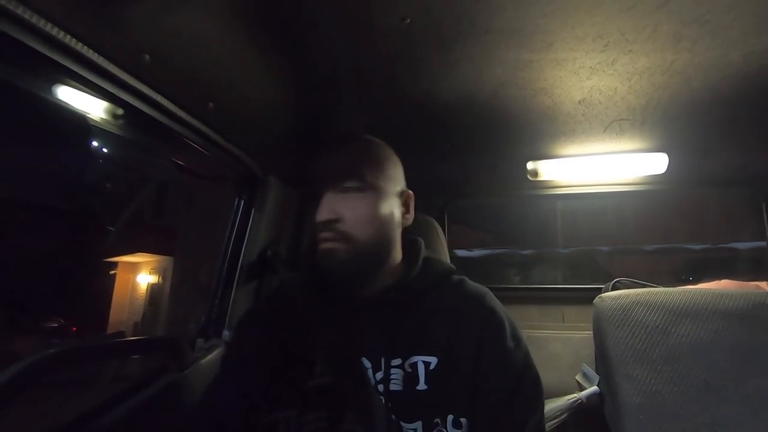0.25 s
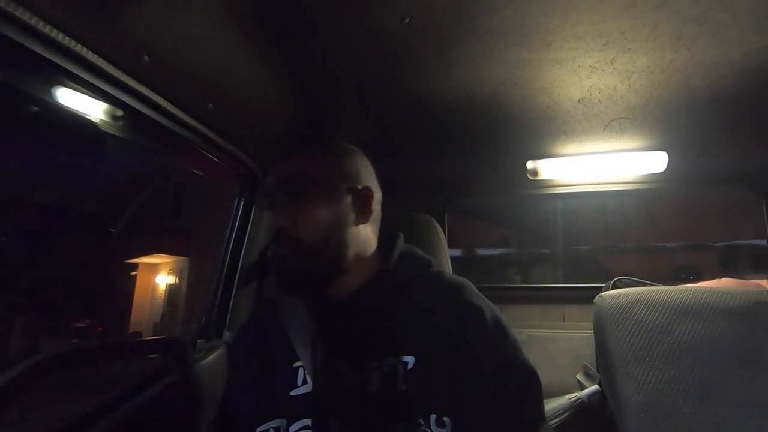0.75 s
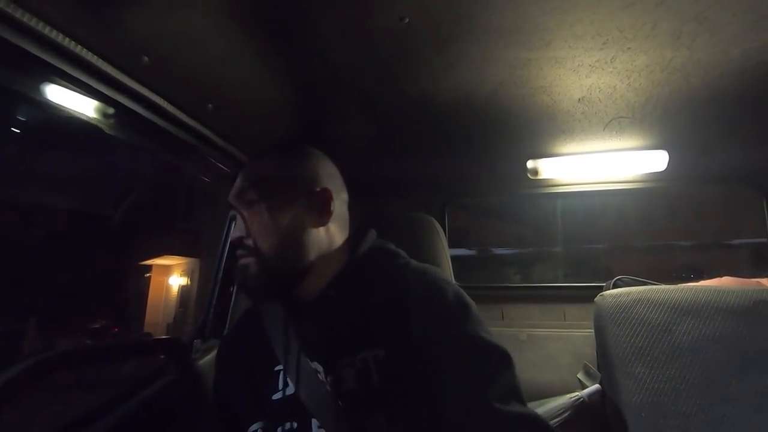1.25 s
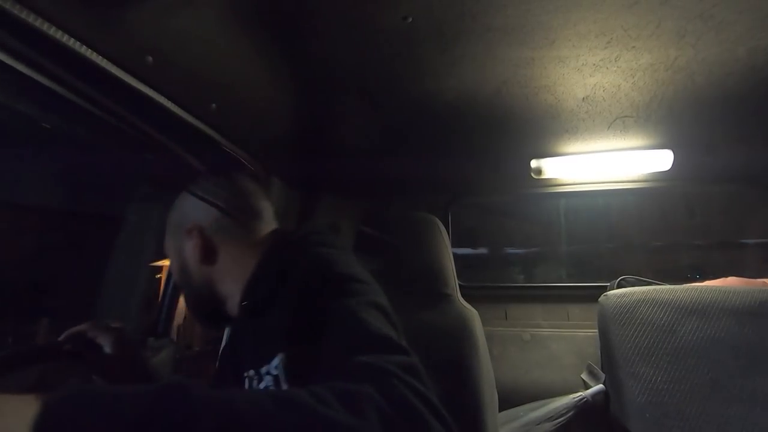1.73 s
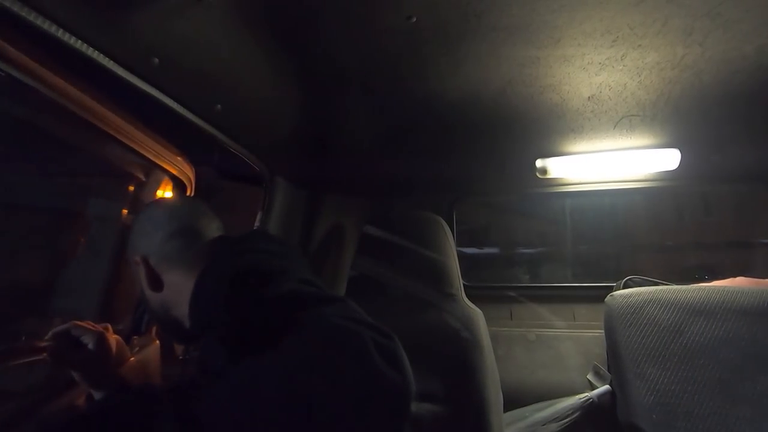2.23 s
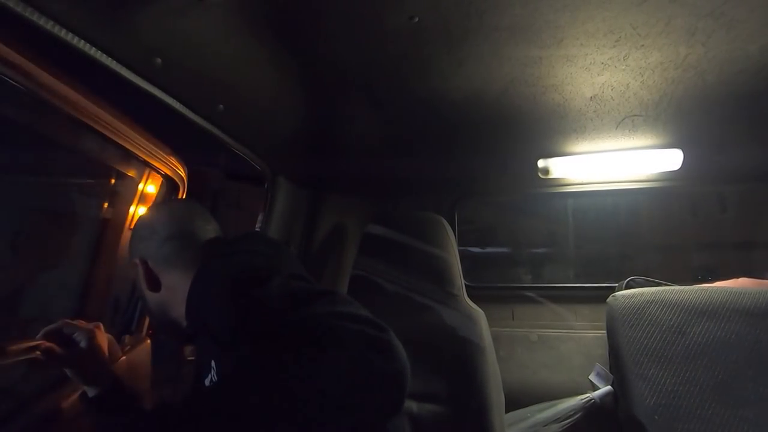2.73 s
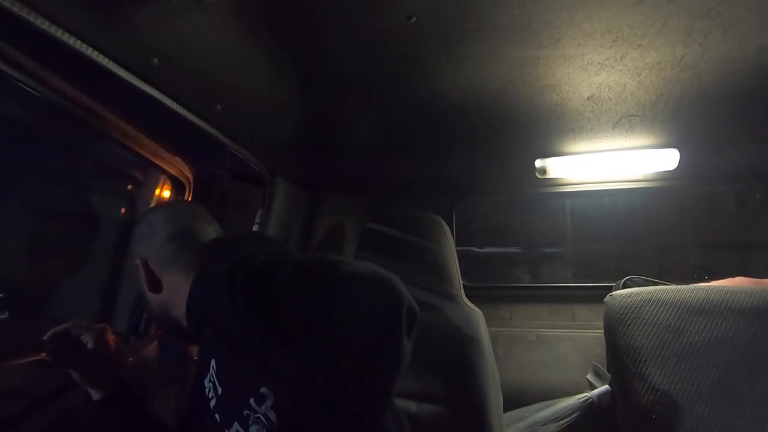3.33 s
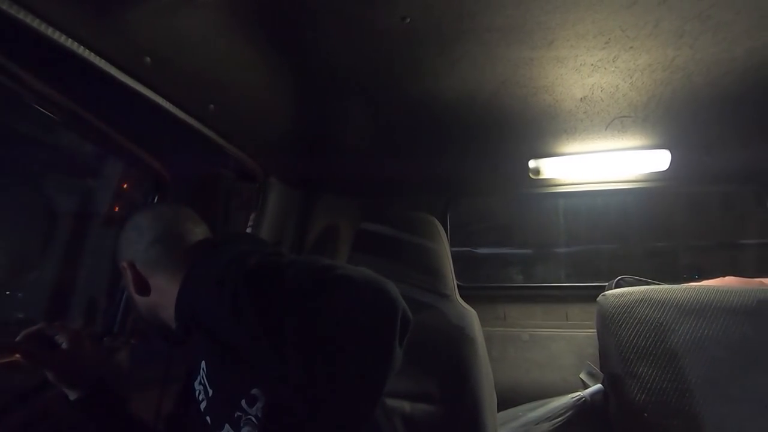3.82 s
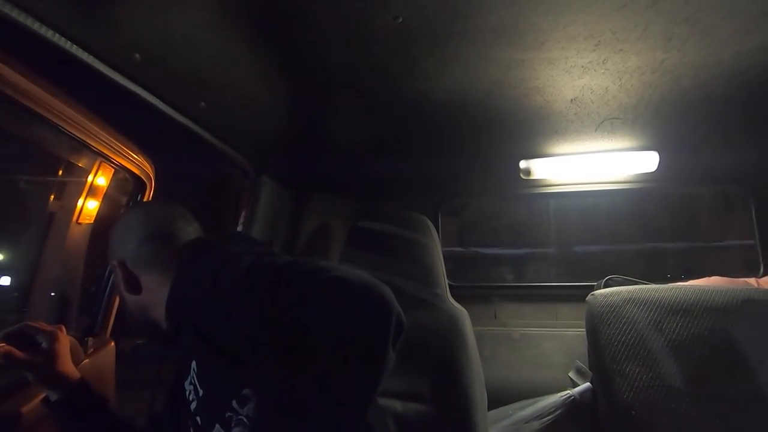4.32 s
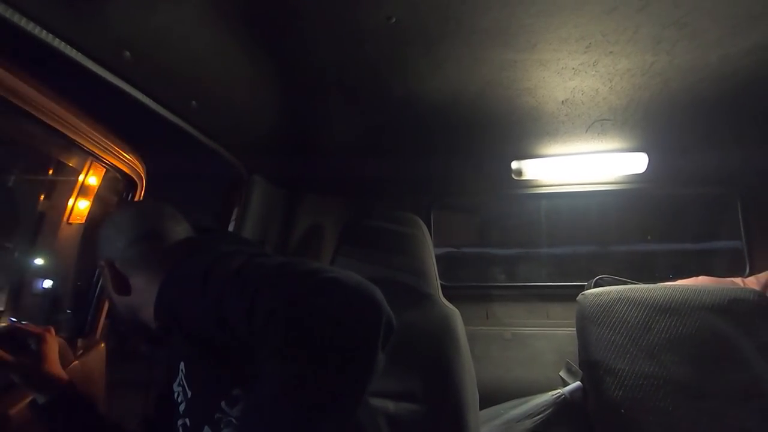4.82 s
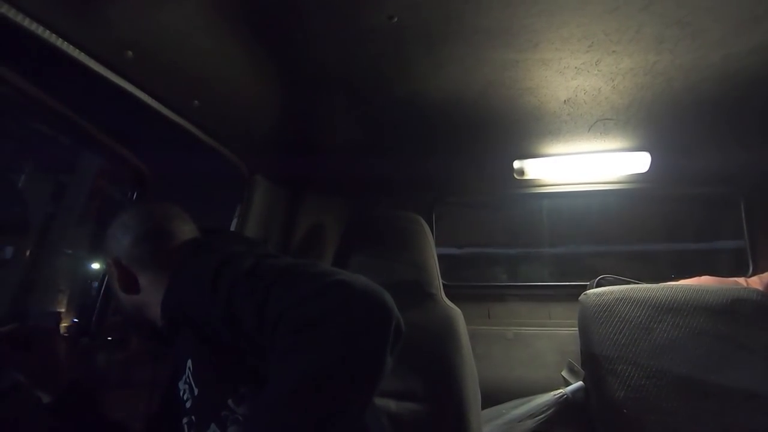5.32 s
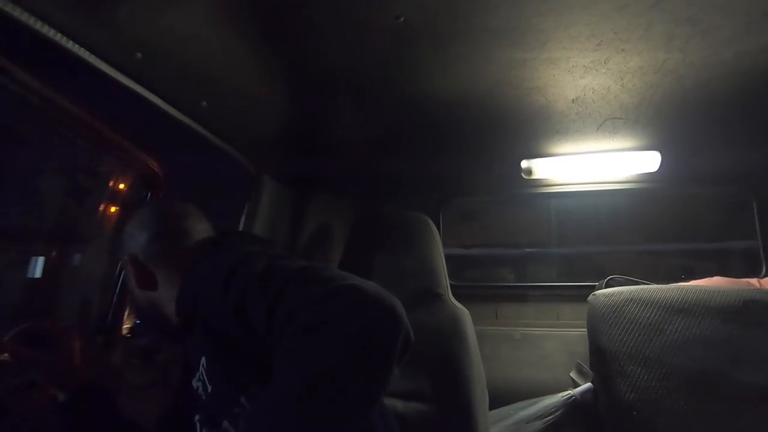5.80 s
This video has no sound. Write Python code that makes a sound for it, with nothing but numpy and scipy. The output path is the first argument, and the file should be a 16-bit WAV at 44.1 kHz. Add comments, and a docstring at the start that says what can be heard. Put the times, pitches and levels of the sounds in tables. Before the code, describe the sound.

A turn signal ticks close by throughout, over the low chug of a diesel engine and the rumble of a slowly rolling truck, heard in stereo from the cab. Early on come a faint hiss and a small click, then the door unlatches with two clunks and a clack. The engine grows clearer, revs briefly and keeps pulling with a hard knock, ending on two short clatters.

```python
"""Inside the cab of a small diesel truck creeping along near idle, on a stereo microphone.
At first four cylinders boom and clatter under the floor, one injector ticking, over road rumble;
a soft hiss dies away, something clicks near the wheel, and the indicator relay ticks throughout.
At 1.2 s the driver's door opens with a double clunk and a sharp clack, and more engine comes in.
After 2 s the engine picks up with two injector ticks, knocks under load and ends on two clatters."""
import sys
import numpy as np
from scipy import signal
from scipy.fft import rfft, irfft
from scipy.io import wavfile
from scipy.ndimage import uniform_filter1d

SR = 44100
rng = np.random.default_rng(int(sys.argv[2]) if len(sys.argv) > 2 else 0)


def output_pcm(signal):
    """Save a mono or channel-first signal as 16-bit PCM at the path in sys.argv[1].

    Samples are clipped to [-1, 1] before scaling.
    """
    pcm = np.clip(np.atleast_2d(signal).T, -1, 1) * 32767
    wavfile.write(sys.argv[1], SR, np.round(pcm).astype(np.int16))


N = 267246
TIME = np.arange(N) / SR
FREQS = np.fft.rfftfreq(N, 1 / SR)


def undb(db):
    """Decibels to gain."""
    return 10 ** (np.asarray(db) / 20)


def unit(x):
    """Scale to rms 1."""
    return x / np.sqrt(np.mean(x ** 2))


def curves(table):
    """Each column after the time column as a value per sample."""
    s, *columns = np.transpose(table)
    return [np.interp(TIME, s, c) for c in columns]


def along(points, freqs):
    """Read (f/Hz, value) points on a log-frequency axis."""
    hz, value = np.transpose(points)
    return np.interp(np.log(freqs + 1), np.log(hz), value)


def colour(points, freqs):
    """Gain of a spectrum that falls away beyond its ends."""
    low, high = points[0][0], points[-1][0]
    return undb(along(points, freqs)) * np.minimum(freqs / low, 1) ** 2 / np.maximum(freqs / high, 1) ** 3


def resonances(modes, freqs):
    """Response of a surface that passes sound and rings at its modes."""
    return 1 + sum(undb(db) / (1 + 2j * (freqs - hz) / width) for hz, width, db in modes)


def causal(gain):
    """The minimum-phase response with this gain: it rings only after its blow."""
    cepstrum = irfft(np.log(gain + 1e-4))
    return np.exp(rfft(cepstrum * (1 + np.sign(np.fft.fftfreq(len(cepstrum))))))


def walk(rate_hz):
    """Smooth random wander with a spread near 1."""
    k = int(SR / rate_hz)
    held = np.repeat(rng.standard_normal(N // k + 1), k)
    return 1.3 * uniform_filter1d(uniform_filter1d(held, k), k)[:N]


def fade(t, t60):
    """Exponential decay by 60 dB in t60 seconds."""
    return np.exp(-np.log(1000) * t / t60)


def add(out, s, sound):
    """Mix a sound in at time s."""
    start = int(s * SR)
    out[:, start:start + sound.shape[-1]] += sound[..., :N - start]


# stereo width at the microphone: f/Hz, side minus mid/dB
MIC_WIDTH = [(30, -6), (110, -13.5), (220, -16), (380, -12), (700, -1.5), (1300, -1), (2400, -4),
             (4400, -4.5), (8000, 0.5)]
def diffuse(envelope, gain, freqs):
    """Coloured noise under an envelope; long waves reach both microphone ports alike, short ones differ."""
    mid, side = rfft(rng.standard_normal((2, len(envelope))) * envelope) * gain
    side = side * undb(along(MIC_WIDTH, freqs))
    return irfft(np.array([mid + side, mid - side]), len(envelope))


def burst(t, points, modes, t60, tilt_db, attack_s):
    """A crack scattered by the close cab walls, tilted by tilt_db an octave above 500 Hz."""
    freqs = np.fft.rfftfreq(len(t), 1 / SR)
    envelope = fade(t, t60) * (1 - np.exp(-t / attack_s))
    gain = colour(points, freqs) * undb(tilt_db * np.log2(np.maximum(freqs, 500) / 500))
    crack = diffuse(envelope, causal(gain) * resonances(modes, freqs), freqs)
    return unit(crack) * np.sqrt(np.mean(envelope ** 2))


# road rumble all round the microphone: f/Hz, level/dB
ROAD_COLOUR = [(10, -14), (32, 4.5), (48, 4.5), (72, -4.5), (100, -3.3), (160, -4.5), (220, -11.5),
               (300, -18.5), (420, -23), (700, -32)]
def road(level_db, swell_db, ease_db_per_s):
    """Tyres and suspension shake the cab unevenly, a little less as the truck rolls on."""
    shake = unit(diffuse(undb(swell_db * walk(13)), colour(ROAD_COLOUR, FREQS), FREQS))
    return undb(level_db - ease_db_per_s * (TIME - TIME.mean())) * shake


# faint whine behind the engine: t/s, level/dB
WHINE_LEVEL = [(1.2, -85), (1.5, -62), (2.05, -57), (2.4, -55.5), (2.8, -62.5), (3.25, -59), (3.7, -68),
               (6, -71)]
def whine(hz, drift_hz, flutter_db):
    """A thin wavering tone, perhaps a pump or pulley, swells as the door opens and then fades."""
    phase = np.cumsum(hz + drift_hz * walk(40)) / SR
    level_db = curves(WHINE_LEVEL)[0] + flutter_db * walk(24.76)
    return np.sqrt(2) * undb(level_db) * np.sin(2 * np.pi * phase)


# hiss as it reaches the cab, of air and injectors alike: f/Hz, level/dB
HISS_COLOUR = [(1500, 9), (2800, 2.5), (3600, 5.5), (4400, 2.5), (5400, 1.5), (6500, 0), (7600, 2.5),
               (8900, -0.5), (9800, -6), (10800, -14.5), (13000, -22), (16000, -27.5)]
def air_hiss(level_db, t60):
    """A soft hiss, perhaps air from the brakes, dies away at the start."""
    hiss = unit(diffuse(np.ones(N), colour(HISS_COLOUR, FREQS), FREQS))
    return undb(level_db) * fade(TIME, t60) * hiss


# click near the wheel: f/Hz, level/dB
CLICK_COLOUR = [(500, -2), (1100, -3), (1550, 4), (2000, -15.5), (4500, -27), (8500, -27), (11000, -46)]
def click(at_s, level_db, t60):
    """One small hollow click, perhaps a switch."""
    out, t = np.zeros((2, N)), np.arange(SR // 4) / SR
    add(out, at_s, undb(level_db) * burst(t, CLICK_COLOUR, [], t60, tilt_db=0, attack_s=0.00081))
    return out


# relay housing, close by in the cab: f/Hz, t60/s, level on closing/dB, level on opening/dB
HOUSING_MODES = [(2055, 0.23, -17, -34), (3090, 0.076, -16, -6.5), (3320, 0.034, -12, -3),
                 (3457, 0.029, 6, 6), (3590, 0.035, -7, -0.5), (4165, .03, -12, -6),
                 (4300, 0.043, -11, -17), (5050, 0.06, -23.5, -6.5), (6130, 0.031, -15, -8),
                 (7800, 0.031, -21, -17)]
# how strongly each tick in turn rings the housing: level/dB
HOUSING_ACCENTS = [1.5, 1.5, 0.5, -1, 0.5, -0.5, 2.5, -3, 2, -0.5, 2, 0.5, -1, -2.5, -1, -0.5, -0.5]
# snap of the armature: f/Hz, level/dB
SNAP_COLOUR = [(600, -6.5), (1800, 1.5), (2600, -1.5), (3300, 7), (4500, 0), (6000, -8), (8600, -2),
               (10500, -19.5), (15000, -40)]
def indicator(level_db, ease_db_per_s, ring_db, snap_db, snap_t60):
    """Once a blink the relay armature closes and opens, snapping and ringing its housing in two colours."""
    first_s, blink_s, growth_s, closed_s = .2567, .696, .0005, .3555
    out, t = np.zeros((2, N)), np.arange(SR // 3) / SR
    blink = np.arange(int(N / SR / blink_s) + 1)
    closings = first_s + blink_s * blink + growth_s * blink ** 2 / 2
    ticks = np.column_stack([closings, closings + closed_s]).ravel()
    for k, (s, accent_db) in enumerate(zip(ticks[ticks < N / SR], HOUSING_ACCENTS)):
        phases = rng.random((len(HOUSING_MODES), 1, 1))
        phases = phases + 0.083 * rng.standard_normal((len(HOUSING_MODES), 2, 1))  # left and right differ
        ring = sum(undb(dbs[k % 2]) * fade(t, t60) * np.sin(2 * np.pi * (hz * t + phase))
                   for (hz, t60, *dbs), phase in zip(HOUSING_MODES, phases))
        ring = ring * (1 - np.exp(-t / 0.0024))
        snap = burst(t, SNAP_COLOUR, [], snap_t60, tilt_db=0, attack_s=0.0012)
        tick = undb(ring_db + accent_db) * ring + undb(snap_db) * snap
        add(out, s, undb(level_db - ease_db_per_s * s) * tick)
    return out


# at the microphone: door latch clunks, small cab knocks, two injector ticks (2.178 and 2.331 s)
# and two closing bursts of engine clatter (5.951 and 6.038 s):
# t/s, crack level/dB, thump level/dB, thump centre f/Hz, crack t60/s, tilt/(dB per octave)
CLUNKS_AND_ENGINE_KNOCKS = [(0.679, -35.5, -56, 200, 0.084, -5.5), (.905, -36, -64, 200, 0.085, -6),
                            (1.026, -33, -57, 200, 0.06, -3.5), (1.087, -39.5, -33.5, 400, 0.079, 0.5),
                            (1.125, -31.5, -30, 200, 0.071, -0.5), (1.144, -29.5, -32, 200, 0.064, -0.5),
                            (1.169, -35, -50, 200, .04, 0), (1.18, -31, -45, 200, 0.075, -2),
                            (1.203, -32, -15, 95, 0.06, -1), (1.214, -20.5, -21, 130, 0.21, -4.5),
                            (1.22, -13, 1, 206, 0.053, -4), (1.254, -22, -43, 200, 0.083, -2.5),
                            (1.266, -13, -7.5, 270, 0.074, -3.5), (1.308, -29, -18, 165, 0.13, -11),
                            (1.402, -21, -50, 400, 0.027, 0), (1.409, -11.5, -14.5, 450, 0.061, 3.5),
                            (1.418, -19.5, -14.5, 300, 0.043, 5), (1.447, -35, -19.5, 115, .08, -15),
                            (1.537, -27, -42, 200, 0.082, -6.5), (1.804, -22, -29, 300, 0.052, -3.5),
                            (1.981, -30.5, -36, 200, .06, -4.5), (2.178, -34.5, -42, 200, 0.054, -1),
                            (2.259, -26, -35, 200, 0.061, -6.5), (2.331, -37, -45, 200, 0.064, 0),
                            (5.703, -25, -37, 200, 0.031, -1), (5.951, -30.5, -60, 200, .12, -4),
                            (6.038, -30, -29, 200, 0.18, -5.5)]
# crack of a knock: f/Hz, level/dB
CRACK_COLOUR = [(150, 8.5), (280, 5.5), (450, -2.5), (680, -1.5), (1000, 1.5), (1300, -4.5), (1900, -4.5),
                (2650, -4), (3300, -10.5), (5000, -15.5), (6400, -15.5), (8800, -17), (11000, -33),
                (16000, -46)]
# rings in the crack: f/Hz, width/Hz, level/dB
CRACK_MODES = [(650, 24, -11), (876, 12, -9), (1650, 110, 1), (1920, 45, 2), (2036, 38, 0), (2650, 48, -2),
               (2900, 50, -12), (3830, 65, -7.5), (6350, 70, 6.5), (8866, 60, -3)]
# cab body under a knock: f/Hz, t60/s, level/dB
THUMP_MODES = [(93, 0.22, -3.5), (133.4, 0.31, -12), (171, 0.061, -24), (204, 0.063, 1), (213, 0.027, -20),
               (269.5, 0.088, -19.5), (353, 0.09, -10), (383, 0.027, -43), (402, 0.032, 1),
               (620.5, 0.068, -6), (677, 0.064, -3.5), (880, 0.013, -14)]
def knocks(crack_trim_db, thump_trim_db, push_s, lag_s, reach_octaves, tail_db, tail_t60):
    """Each knock of door, cab or engine cracks, sets the cab body swinging and leaves a dull tail."""
    out, t = np.zeros((2, N)), np.arange(SR // 2) / SR
    push = 1 - np.exp(-(t / push_s) ** 2)  # the heavy panels take a moment to get going
    for s, crack_db, thump_db, centre_hz, t60, tilt_db in CLUNKS_AND_ENGINE_KNOCKS:
        thump = 0
        for hz, mode_t60, db in THUMP_MODES:
            gain = undb(db) / (1 + (np.log2(hz / centre_hz) / reach_octaves) ** 2)
            thump = thump + gain * fade(t, mode_t60) * np.sin(2 * np.pi * hz * t)
        crack = burst(t, CRACK_COLOUR, CRACK_MODES, t60, tilt_db, attack_s=0.0021)
        tail = burst(t, CRACK_COLOUR, CRACK_MODES, tail_t60, tilt_db - 11, attack_s=0.0031)
        add(out, s, undb(crack_db + crack_trim_db) * (crack + undb(tail_db) * tail))
        add(out, s + lag_s, undb(thump_db + thump_trim_db) * push * thump)
    return out


# strength of each cylinder's knock: level/dB
CYLINDER_LEVELS = [-9.5, -9, -9.5, -7]
def firing(firings, rise, decay, floor, scatter_db):
    """Envelope of unequal knocks over a steady floor; rise and decay are shares of one firing."""
    cycles = firings + 5 / 12
    count, phase = cycles.astype(int), cycles % 1
    size_db = np.take(CYLINDER_LEVELS, count, mode="wrap") + scatter_db * rng.standard_normal(256)[count]
    knock = (1 - np.exp(-(phase / rise) ** 2)) * np.exp(-phase / decay)
    return floor + unit(knock) * undb(size_db)


# thin metallic rings, probably of the injector pipes: f/Hz, width/Hz, level/dB
INJECTOR_MODES = [(3700, 42, -16), (5570, 39, -15.5), (5900, 16, -3), (6100, 22, -24), (6348, 40, 4.5),
                  (6550, 64, 1.5), (6840, 76, -3), (9300, 57, -2.5)]
def metallic_hiss(envelope):
    """Hiss with thin rings in it, at rms 1."""
    return unit(diffuse(envelope, colour(HISS_COLOUR, FREQS) * resonances(INJECTOR_MODES, FREQS), FREQS))


def injectors(firings, grain_db):
    """Injectors and valves add a short hiss to each firing."""
    envelope = firing(firings, rise=.2, decay=.4, floor=.46, scatter_db=2)
    return metallic_hiss(envelope * undb(grain_db * walk(500)))


def injector_tick(firings, at_firing, rise, decay, scatter_db):
    """One injector of the four is noisy: a sharp tick in every fourth firing."""
    cycles = (firings - at_firing) / 4 + 1
    count, since = cycles.astype(int), 4 * (cycles % 1)
    strength = undb(scatter_db * rng.standard_normal(64)[count])
    envelope = (1 - np.exp(-since / rise)) * np.exp(-since / decay) * strength
    return np.sqrt(np.mean(envelope ** 2)) * metallic_hiss(envelope)


# combustion clatter from under the floor: f/Hz, level/dB
CLATTER_COLOUR = [(300, -35), (520, 6.5), (620, 1), (900, -3), (1050, 0), (1200, -0.5), (1500, 1),
                  (1850, -3), (2250, -7.5), (2650, -7), (3200, -10), (4500, -17), (8000, -37.5)]
# floor and dash panels: f/Hz, width/Hz, level/dB
FLOOR_MODES = [(600, 12, -2), (750, 24, -1.5), (863, 18, 8.5), (1047, 20, 3.5), (1730, 14, -6),
               (2127, 27, -0.5), (2480, 59, -12), (2854, 44, -3)]
def clatter(firings):
    """Diesel combustion knocks through the floor and rings its panels."""
    envelope = firing(firings, rise=.14, decay=.42, floor=.58, scatter_db=1.2)
    return unit(diffuse(envelope, colour(CLATTER_COLOUR, FREQS) * resonances(FLOOR_MODES, FREQS), FREQS))


# how hard the engine pulls: t/s, level/dB
ENGINE_LOAD = [(0, -40), (2.0, -28), (2.35, -2.5), (2.8, -9.5), (3.3, -10.5), (3.8, -5), (4.4, -0.5),
               (5.5, -3.5), (5.8, -7), (5.9, -23), (6.03, -10.5)]
# engine block, heard from the cab: f/Hz, width/Hz, level/dB
BLOCK_RINGS = [(727.7, 23, 5.5), (1046, 14, -6), (1275, 20, -3.5), (1366, 29, 3.5), (1442, 14.6, 8),
               (1561, 23, 7.5), (1667, 33, -1), (1754, 33, -2.5)]
def diesel_knock(firings, full_load_db):
    """Under load each ignition rings the engine block in a distinct pulse."""
    envelope = firing(firings, rise=.11, decay=.3, floor=.02, scatter_db=1.3)
    block = sum(undb(db) / (1 + 2j * (FREQS - hz) / width) ** 2 for hz, width, db in BLOCK_RINGS)
    rings = diffuse(np.ones(N), block, FREQS)
    rings = rings / np.sqrt(uniform_filter1d(rings ** 2, size=SR // 40))  # like energy for every blow
    return undb(full_load_db + curves(ENGINE_LOAD)[0]) * unit(rings * envelope)


# how well the cab carries upper engine notes to the microphone: f/Hz, level/dB
CAB_RESPONSE = [(65, 7), (125, -5.5), (175, 0), (220, -6), (255, -5.5), (290, -4.5), (320, 2.5), (350, -13),
                (390, 0), (430, -17.5), (520, -18.5)]
# hum of the surrounding body panels: f/Hz, level/dB
PANEL_COLOUR = [(150, -24), (230, -6), (320, -1), (400, 0.5), (480, -8.5), (620, -16), (900, -13.5)]
def drone(firings, hz, lines_db, panels_db, waver_db):
    """Upper engine notes swell as they pass the cab's resonances, over the hum of shaken panels."""
    lines = 0
    for k in (3, *range(5, 21)):
        gain = undb(along(CAB_RESPONSE, k * hz) + waver_db * walk(9))
        lines = lines + gain * np.sin(2 * np.pi * (k * firings + rng.random()) + 0.1 * walk(4.37))
    panels = diffuse(np.ones(N), colour(PANEL_COLOUR, FREQS), FREQS)
    return undb(lines_db) * unit(lines) + undb(panels_db) * unit(panels)


# firing note in the cab: t/s, level/dB
FIRING_NOTE = [(0.0, -28), (1.5, -38), (1.78, -24), (2.02, -21.5), (2.13, -23), (2.3, -18.5), (2.51, -16.5),
               (2.9, -20), (3.15, -27.5), (3.39, -16), (3.58, -22), (4.72, -24.5), (4.83, -41), (4.94, -19),
               (5.65, -18.5), (5.81, -26)]
# its multiples, ahead of the air resonances: t/s, second level/dB, third level/dB, fourth level/dB
FIRING_MULTIPLES = [(1.5, -2.5, -8, -4.5), (1.95, 3.5, -9, -4), (2.4, -3, -4, -2.5), (2.8, -3, -8, -3.5),
                    (3.3, -4, -10, -2), (3.7, 0, -10, -6), (4.15, -1.5, -10, -2.5), (4.6, -2.5, -10, 0.5),
                    (5.6, -2, -10, -3)]
# resonances of the cab air around the microphone: f/Hz, width/Hz, level/dB
CAB_AIR_MODES = [(47.54, 6.3, -25.5), (95.95, 6.95, -28)]
def boom(firings, hz, waver_db, uneven_db, flutter_db):
    """The lowest notes pressurise the cab and swell at its air resonances; unequal firings chug."""
    phase = firings + 0.3645 + 0.0091 * walk(26)
    notes = undb(curves(FIRING_NOTE)[0] + waver_db * walk(9.3)) * np.cos(2 * np.pi * phase)
    for k, note_db in enumerate(curves(FIRING_MULTIPLES), start=2):
        response = sum(undb(db) / (1 + 2j * (k * hz - centre) / width)
                       for centre, width, db in CAB_AIR_MODES)
        note = np.real(response * np.exp(2j * np.pi * (k * phase + 0.055 * walk(30))))
        notes = notes + undb(note_db + flutter_db * walk(23.995)) * note
    return -np.sqrt(2) * undb(uneven_db * walk(50)) * notes  # the pressure dips at each firing


# dabs and lifts of the throttle: t/s, half length/s, level change/dB
THROTTLE_DABS = [(2.045, 0.18, 5), (2.153, 0.02, -4), (2.365, .1, 3), (5.812, 0.068, -3),
                 (6.06, 0.098, 3.5)]
def at_microphone(level_db, leak_db, ramp_s, coast_db, door_s=1.23):
    """Gain that follows throttle and coasting, and rises from a leak over ramp_s as the door opens."""
    coasting = 1 - undb(curves(ENGINE_LOAD)[0])
    throttle_db = sum(db * np.exp(-((TIME - s) / length_s) ** 2) for s, length_s, db in THROTTLE_DABS)
    let_in = np.clip((TIME - door_s) / ramp_s, 0, 1)  # a negative ramp falls to the leak by door_s
    return undb(level_db + coast_db * coasting + throttle_db) * np.sqrt(undb(leak_db) ** 2 + let_in)


# speed of the engine under the floor: t/s, firing f/Hz
FIRING_RATE = [(0, 22.27), (1.25, 20.68), (1.85, 21.25), (2.15, 22.59), (2.4, 32.34), (2.65, 29.66),
               (3.2, 26.89), (3.5, 25.01), (4.35, 24.14), (5.05, 25.85), (5.4, 26.38), (5.7, 25.46),
               (6.06, 25.85)]
def engine(injection_lead):
    """One crankshaft drives these engine layers; the injectors' hiss leads by a share of a firing."""
    hz = curves(FIRING_RATE)[0]
    firings = np.cumsum(hz) / SR
    drone_gain = at_microphone(level_db=-42.5, leak_db=-6, ramp_s=3, coast_db=-2.5)
    clatter_gain = at_microphone(level_db=-47, leak_db=-11, ramp_s=2, coast_db=0.85)
    tick_gain = at_microphone(level_db=-47.5, leak_db=-20, ramp_s=-0.5, coast_db=-6)  # recedes early
    # the treble gets in through the door's first crack
    hiss_gain = at_microphone(level_db=-52.5, leak_db=-14.5, ramp_s=0.02, coast_db=-4)
    return (boom(firings, hz, waver_db=0.93, uneven_db=0.5, flutter_db=2.5)
            + drone_gain * drone(firings, hz, lines_db=4.5, panels_db=-3.5, waver_db=2)
            + diesel_knock(firings, full_load_db=-47.5)
            + clatter_gain * clatter(firings)
            + tick_gain * injector_tick(firings, at_firing=2.66, rise=.08, decay=0.39, scatter_db=3)
            + hiss_gain * injectors(firings + injection_lead, grain_db=1))


# balance of the two microphone ports: f/Hz, left minus right/dB
MIC_BALANCE = [(30, 2), (100, -2.5), (200, 1), (380, -2.5), (700, -2), (1290, -7.5), (2380, -3), (4400, -2),
               (8000, -2)]
def scene():
    """Everything in the cab, leaning a little to the microphone's right."""
    cab = (engine(injection_lead=0.1)
           + whine(hz=1040, drift_hz=4.85, flutter_db=2.5)
           + road(level_db=-31, swell_db=2.4, ease_db_per_s=0.41)
           + indicator(level_db=-35.5, ease_db_per_s=.5, ring_db=-0.6, snap_db=-3.5, snap_t60=0.082)
           + knocks(crack_trim_db=-2.5, thump_trim_db=4, push_s=0.0076, lag_s=0.0027,
                    reach_octaves=0.65, tail_db=-5, tail_t60=0.12)
           + click(at_s=.5135, level_db=-35, t60=0.061)
           + air_hiss(level_db=-61, t60=0.91))
    lean_db = along(MIC_BALANCE, FREQS) * np.array([[1], [-1]]) / 2
    return irfft(rfft(cab) * undb(lean_db), N)


def record(dry):
    """The microphone chain cuts the treble steeply above 15.7 kHz."""
    return signal.sosfilt(signal.ellip(8, .2, 70, 15700, fs=SR, output="sos"), dry)


dry = scene()
out = record(dry)
output_pcm(out)
```